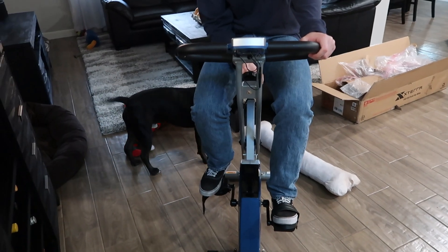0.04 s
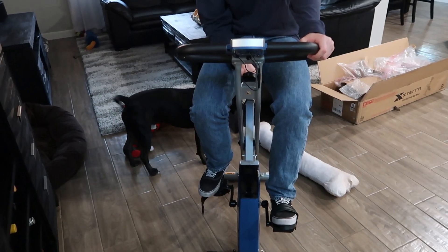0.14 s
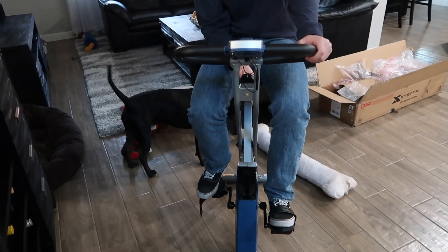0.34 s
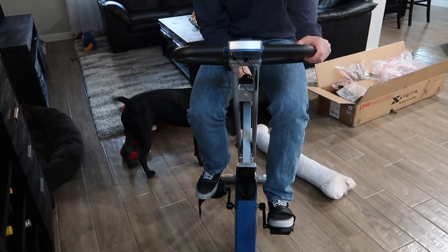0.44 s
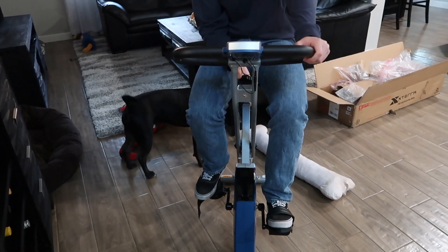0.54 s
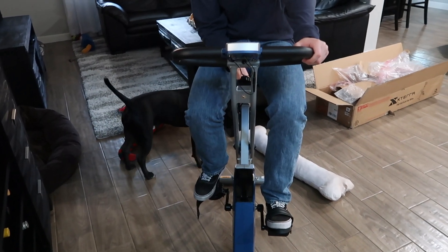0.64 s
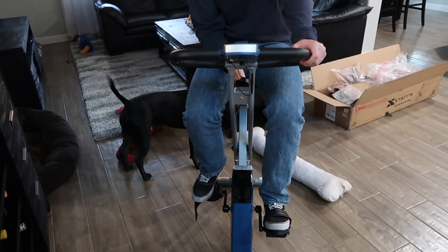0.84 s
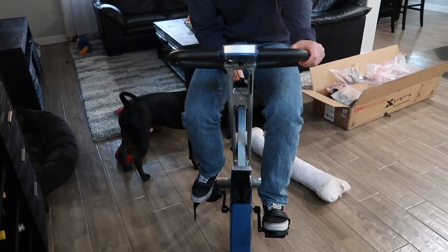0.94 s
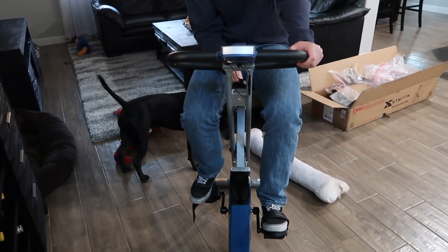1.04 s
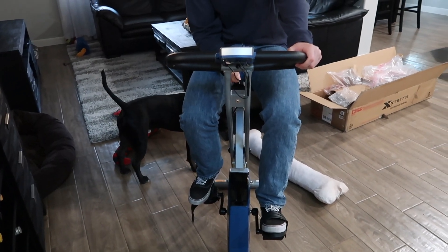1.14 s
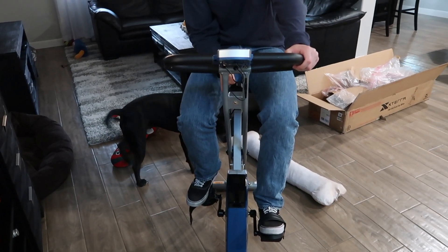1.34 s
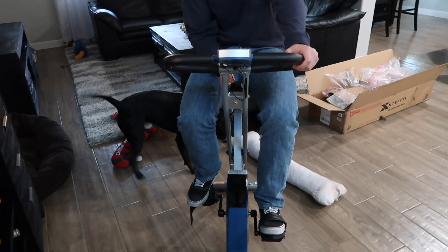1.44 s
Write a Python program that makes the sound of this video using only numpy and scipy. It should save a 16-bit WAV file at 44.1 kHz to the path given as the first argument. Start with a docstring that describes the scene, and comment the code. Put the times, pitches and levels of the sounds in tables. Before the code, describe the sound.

An exercise bike's tension knob snaps through four sharp, unevenly spaced clicks, each with a brief dull frame thud and short room echo, close to the microphone over quiet hum and faint rustling.

```python
"""The tension knob of a folding exercise bike is turned notch by notch in a living room with a hard floor.
Each detent snaps: a sharp tick, short modes in knob and shell, and a thud that swells in the frame.
The snaps bounce off floor and furniture and die away in the room as decaying stereo noise.
One snap falls before the start, so only its room tail is heard.
Below lie a quiet room hum, an uneven low rumble and a soft rustle, all made of coloured noise."""
import sys
import numpy as np
from scipy import signal
from scipy.fft import rfft, irfft
from scipy.io import wavfile

SR = 44100
rng = np.random.default_rng(int(sys.argv[2]) if len(sys.argv) > 2 else 0)


def output_pcm(signal):
    """Save a mono or channel-first signal as 16-bit PCM at the path in sys.argv[1].

    Samples are clipped to [-1, 1] before scaling.
    """
    pcm = np.clip(np.atleast_2d(signal).T, -1, 1) * 32767
    wavfile.write(sys.argv[1], SR, np.round(pcm).astype(np.int16))


N = 66150
LEAD = SR // 2   # samples of run-up, so that the snap before the start can leave its tail

# The detent snaps. Each row: start in seconds, thud of the frame in dB, pitch of the knob shell in Hz,
# shell level in dB, then the ring emphasis in dB at 2.1, 2.9, 4, 5.3 and 11 kHz.
SNAPS = [(-.22, -2, 1480, -46, -23.5, -18, -10.5, -12.5, 3),
         (0.2045, -3, 1373, -25, -2, -1.5, -4.5, -6.5, -9.5),
         (0.4418, -1, 1340, -24, -9, -3, -6, -7.5, -7.5),
         (0.7305, 0, 1402, -23.5, 2, -8.5, -6, -7.5, -10.5),
         (1.155, 2, 1498, -24.5, -3, -6.5, -4.5, -5.5, -6)]
# Stereo width of the background noises. Each row: frequency in Hz, side minus mid in dB.
BACKGROUND_WIDTH = [(60, -28), (110, -12), (200, -2.5), (380, -3), (700, -4.5), (1290, -5.5), (2380, -5),
                    (4400, 2), (8120, -3), (15000, 10)]


def from_db(db):
    """Level in dB to amplitude factor."""
    return 10 ** (np.asarray(db) / 20)


def rms_one(x):
    """Scale to an RMS of one."""
    return x / np.sqrt(np.mean(x ** 2) + 1e-20)


def at_hz(points, hz):
    """Read a curve at a frequency, straight between its points on a log frequency axis."""
    points_hz, values = np.array(points).T
    return np.interp(np.log(hz), np.log(points_hz), values)


def band(x, low_hz, high_hz):
    """Band-pass with gentle slopes."""
    sos = signal.butter(2, [low_hz, min(high_hz, .45 * SR)], "band", fs=SR, output="sos")
    return signal.sosfilt(sos, x)


def ring(t, hz, db, t60):
    """A struck mode: a sine that falls by 60 dB in t60 seconds."""
    return from_db(db - 60 * t / t60) * np.sin(2 * np.pi * hz * t)


def stereo_noise(size, colour, width):
    """Left and right noise of a given colour, built from mid and side so that its width varies with frequency."""
    hz = np.maximum(np.arange(size // 2 + 1) * SR / size, 10)
    mid, side = rfft(rng.standard_normal((2, size))) * from_db(at_hz(colour, hz))
    side = side * from_db(at_hz(width, hz))
    return irfft([mid + side, mid - side], size)


def swell(curve, noise):
    """Noise that follows a level curve in dB over seconds."""
    s, db = np.transpose(curve)
    level_db = np.interp(np.arange(N) / SR, s, db)
    return from_db(level_db) * rms_one(noise)


def frame_thud(t):
    """The frame modes build up after the blow and ring until the floor damps them."""
    # Modes of the frame. Each row: frequency in Hz, relative level in dB, t60 in seconds.
    frame_modes = [(347.4, -26.5, 0.11), (477.3, -30.5, 0.051), (816, -29.5, 0.02), (927.5, -28, 0.03),
                   (1109, -34, 0.046)]
    swell_s, damped_s = 0.0061, 0.023
    build_up = 1 - np.exp(-t / swell_s)
    damping = np.exp(-(t / damped_s) ** 4)
    return build_up * damping * sum(ring(t, *mode) for mode in frame_modes)


def knob_ring(t, colour, chance):
    """The short modes of knob and detent plate, each a little off in level and pitch on every snap."""
    # Modes of knob and plate. Each row: centre pitch in Hz, relative level in dB, t60 in seconds.
    knob_modes = [(1880, -16.5, 0.006), (2020, -14.5, 0.0063), (2540, -11.5, 0.0061), (2899, -11.5, 0.025),
                  (3038, -3.5, 0.005), (3910, -5, 0.0047), (4225, -5.5, 0.0085), (4946, -4, 0.011),
                  (5493, -7, 0.0087), (5970, -3, 0.0055), (6775, -2, 0.004), (7610, -6, 0.0046),
                  (10530, 2.5, 0.0017), (12770, -7.5, 0.0067), (13100, -11, 0.0047), (14470, -4, 0.0011)]
    spread_db, detune = 2, .008   # standard deviations; detune is a share of the pitch
    out = np.zeros(len(t))
    for k, (hz, db, t60) in enumerate(knob_modes):
        level_chance, pitch_chance = chance[k]
        mode_hz = hz * (1 + detune * pitch_chance)
        mode_db = db + at_hz(colour, hz) + spread_db * level_chance
        out += (-1) ** k * ring(t, mode_hz, mode_db, t60)   # neighbours start in opposite directions
    return out


def snaps():
    """Each snap sets off the short rings of knob and shell and the thud of the frame."""
    # Frequencies in Hz at which each snap sets its ring emphasis.
    ring_hz = (2100, 2900, 4000, 5300, 11000)
    shell_t60_s, bass_cut_hz = .02, 202
    out = np.zeros(N + LEAD + SR)
    t = np.arange(SR // 5) / SR
    chances = rng.standard_normal((len(SNAPS), 16, 2))   # level and pitch for each of the 16 knob modes
    thud = frame_thud(t)
    for (s, thud_db, shell_hz, shell_db, *ring_db), chance in zip(SNAPS, chances):
        knob = knob_ring(t, list(zip(ring_hz, ring_db)), chance)
        shell = ring(t, shell_hz, shell_db, shell_t60_s)
        start = int(s * SR) + LEAD
        out[start:start + len(t)] += knob - shell + from_db(thud_db) * thud
    bass_cut = signal.butter(4, bass_cut_hz, "high", fs=SR, output="sos")
    return signal.sosfilt(bass_cut, out[:N + LEAD])


def cracks():
    """The sharp tick of first contact: one band-passed impulse per snap."""
    impulse_db, low_hz, high_hz = -22, 3050, 14000
    ticks = np.zeros(N + LEAD)
    ticks[[int(row[0] * SR) + LEAD for row in SNAPS]] = from_db(impulse_db)
    return band(ticks, low_hz, high_hz)


def near_paths(x):
    """Direct sound and first echoes; those from the side reach one microphone port early."""
    # Sound paths to the microphone. Each row: delay in seconds, level in dB, left minus right in dB.
    paths = [(0, -1.5, 0), (.0019, 0.1, 0.1), (.0025, -4, 1.5), (.0072, -9, -1.5), (.0105, -12, -1.5)]
    port_lag_s = 1.5e-5   # time lead of the nearer port per dB of left-right difference
    size = len(x)
    w = 2 * np.pi * np.arange(size // 2 + 1) * SR / size
    ear = np.array([[.5], [-.5]])   # left, right
    response = 0
    for delay_s, db, pan_db in paths:
        arrival_s = delay_s - ear * pan_db * port_lag_s
        response = response + from_db(db + ear * pan_db) * np.exp(-1j * w * arrival_s)
    return irfft(rfft(x) * response, size)


def room(x):
    """Quick scatter from nearby things, then noise that dies band by band, with a slower tail from the rooms beyond."""
    # Decay of the room. Each row: frequency in Hz, t60 in seconds.
    room_t60 = [(250, .6), (800, 0.45), (2000, 0.56), (5000, 0.57), (8000, 0.36), (14000, 0.17)]
    # Tone of the room tail. Each row: frequency in Hz, relative level in dB.
    tail_colour = [(200, 0), (350, -10), (600, 18), (1000, 3.5), (2000, 6.8), (3000, 0.4), (4500, -2.97),
                   (7000, 0.75), (10000, 0), (13000, -1.9), (15000, -18)]
    # Tone of the near scatter. Each row: frequency in Hz, relative level in dB.
    scatter_colour = [(200, -2.5), (600, 18.5), (1500, 8), (3000, 1.5), (5500, 7), (8000, 5), (15000, 0.5)]
    # Stereo width of the tail. Each row: frequency in Hz, side minus mid in dB.
    tail_width = [(60, -13), (110, -13), (200, -21.5), (380, -40.5), (700, -19.5), (1290, -29),
                  (2380, -11.5), (4400, -5), (8120, 3.5), (15000, 13)]
    room_db, rise_s = -32, .0042
    scatter_db, scatter_t60_s, scatter_narrower_db = 4, 0.078, -19
    far_room_db, far_room_slower = -17.5, 1.47   # the second is a factor on t60

    t = np.arange(SR) / SR
    scatter_width = [(hz, db + scatter_narrower_db) for hz, db in tail_width]
    scatter_fall = from_db(scatter_db - 60 * t / scatter_t60_s)
    response = stereo_noise(SR, scatter_colour, scatter_width) * scatter_fall

    edges = 100 * 2 ** np.arange(0, 7.6, .5)   # half-octave bands in Hz
    noises = [stereo_noise(SR, tail_colour, tail_width) for _ in range(2)]
    for k, (low, high) in enumerate(zip(edges, edges[1:])):
        fall_db = -60 * t / at_hz(room_t60, np.sqrt(low * high))
        fall = from_db(fall_db) + from_db(far_room_db + fall_db / far_room_slower)
        response = response + band(noises[k % 2], low, high) * fall   # neighbouring bands use separate noise

    rise = 1 - np.exp(-(t / rise_s) ** 2)
    response = response * from_db(room_db) * rise
    return signal.fftconvolve(x[None], response, axes=1)[:, :len(x)]


def hum():
    """Steady room hum: coloured noise, strongest in the low mids."""
    # Tone of the hum. Each row: frequency in Hz, relative level in dB.
    hum_colour = [(110, -60), (180, 4.5), (457, -0.5), (583, -6), (771, -15), (878, -15), (1040, -15),
                  (1250, -9), (9910, -22.5), (13400, -42), (15500, -62.5)]
    hum_db = -54.5
    return from_db(hum_db) * rms_one(stereo_noise(N, hum_colour, BACKGROUND_WIDTH))


def rumble():
    """Bass noise whose level rises and falls."""
    # Level of the rumble. Each row: time in seconds, level in dB.
    rumble_level = [(0.0, -53.5), (0.688, -61), (0.844, -53.5), (0.902, -63.5), (1.018, -54), (1.14, -55),
                    (1.164, -65), (1.24, -54.5), (1.474, -53.5), (1.5, -60)]
    # Tone of the rumble. Each row: frequency in Hz, relative spectral level in dB.
    rumble_colour = [(12, -3.5), (20, -9), (65, 4.5), (105, 4), (150, 0.5), (220, -30), (290, -40),
                     (480, -120)]
    return swell(rumble_level, stereo_noise(N, rumble_colour, BACKGROUND_WIDTH))


def rustle():
    """Soft broad noise, an uneven low stir and a faint treble hiss, each band-passed noise on a level curve."""
    # Level of the broad noise. Each row: time in seconds, level in dB.
    broad_level = [(0, -51), (.03, -55.5), (.12, -58), (.3, -50), (1.3, -58.5), (1.4, -46), (1.459, -46.5),
                   (1.5, -43.5)]
    # Level of the treble hiss, which fades out. Each row: time in seconds, level in dB.
    hiss_level = [(0, -56.5), (.012, -52.5), (.035, -68), (.1, -89)]
    # Level of the low stir before the first audible snap: one list. Each row: time in seconds, level in dB.
    stir_levels = [
        [(0.0, -57), (0.01, -55), (0.098, -54.5), (0.184, -56), (0.19, -57)],
    ]
    flat = [(10, 0), (20000, 0)]
    broad, hiss, stir = [stereo_noise(N, flat, BACKGROUND_WIDTH) for _ in range(3)]
    broad = swell(broad_level, band(broad, 250, 2630))
    hiss = swell(hiss_level, band(hiss, 5000, 12900))
    stir_curve = list(stir_levels[0]) + [(.3, -72)]   # then sinks away
    stir = swell(stir_curve, band(stir, 298, 595))
    return broad + hiss + stir


def scene():
    """Snaps near and in the room, over hum, rumble and rustle; the ticks travel only the near paths."""
    struck = snaps()
    knob_in_room = near_paths(struck + cracks()) + room(struck)
    return knob_in_room[:, LEAD:] + hum() + rumble() + rustle()


def record(dry):
    """Peaks are softly rounded and the top treble is cut steeply."""
    ceiling, cutoff_hz = 1.5, 16650   # ceiling: amplitude that the rounded peaks approach
    rounded = ceiling * np.tanh(dry / ceiling)
    treble_cut = signal.cheby2(14, 90, cutoff_hz, fs=SR, output="sos")
    return signal.sosfilt(treble_cut, rounded)


dry = scene()
out = record(dry)
output_pcm(out)
```